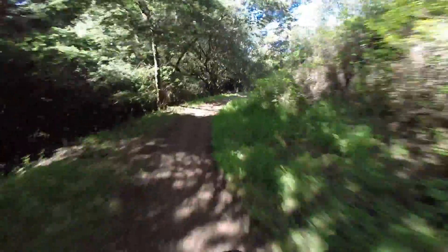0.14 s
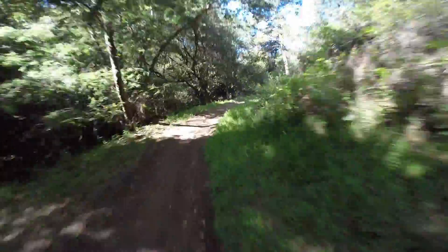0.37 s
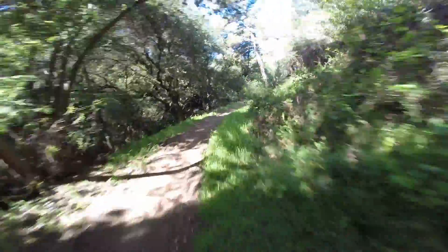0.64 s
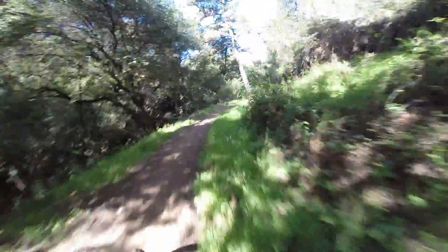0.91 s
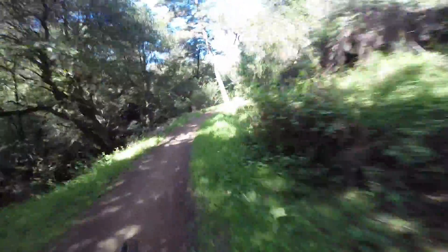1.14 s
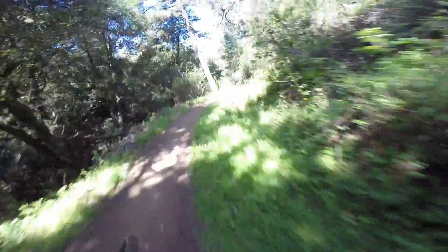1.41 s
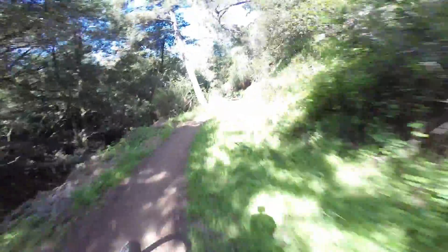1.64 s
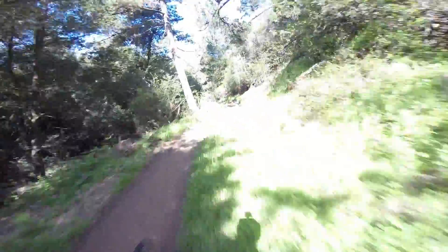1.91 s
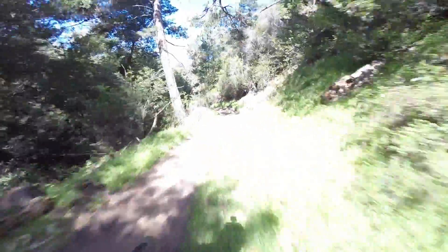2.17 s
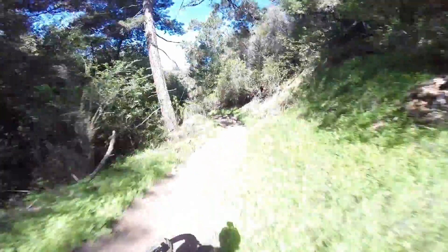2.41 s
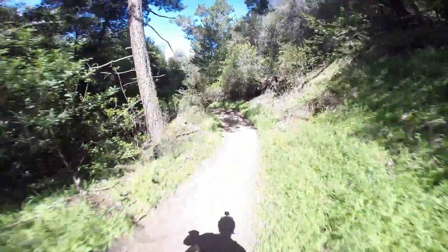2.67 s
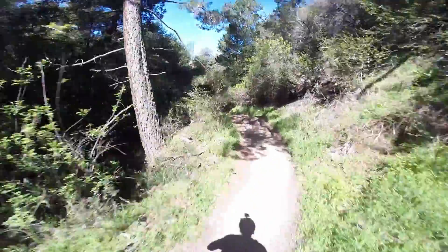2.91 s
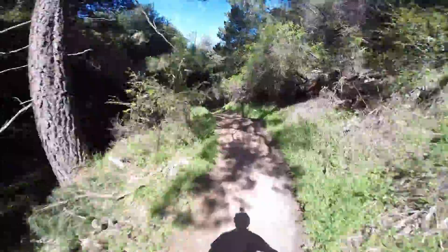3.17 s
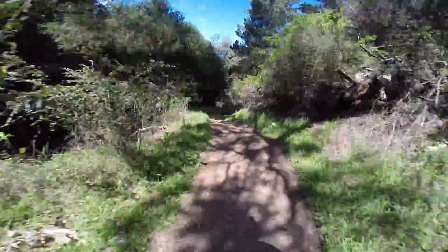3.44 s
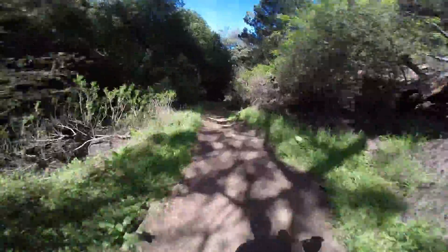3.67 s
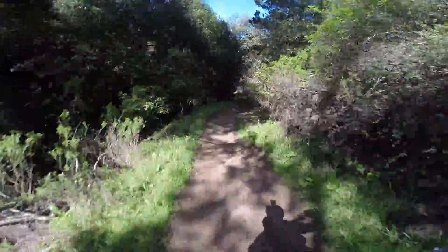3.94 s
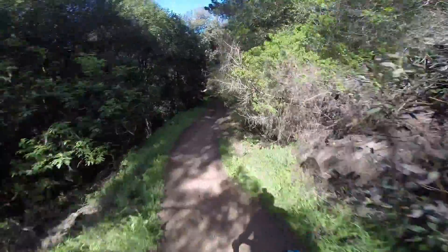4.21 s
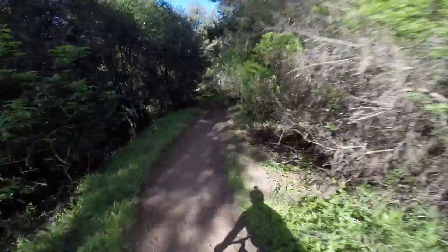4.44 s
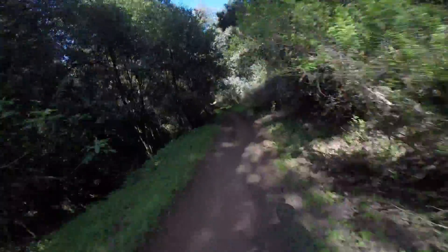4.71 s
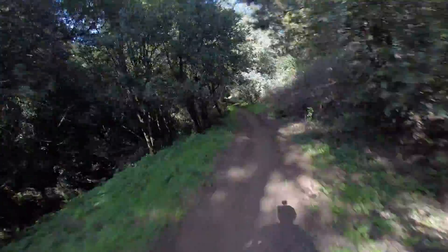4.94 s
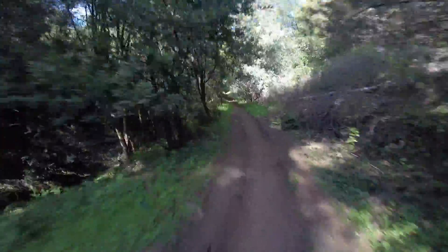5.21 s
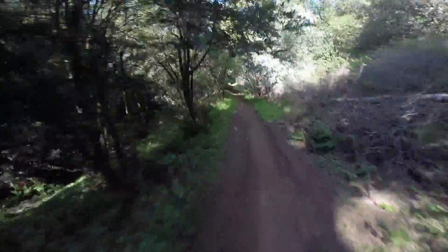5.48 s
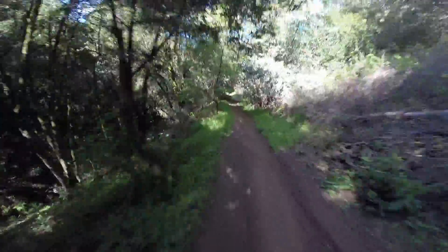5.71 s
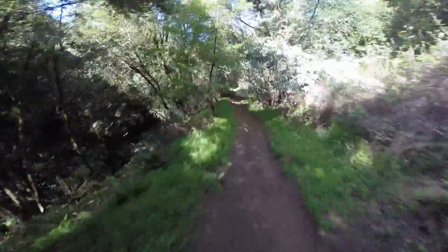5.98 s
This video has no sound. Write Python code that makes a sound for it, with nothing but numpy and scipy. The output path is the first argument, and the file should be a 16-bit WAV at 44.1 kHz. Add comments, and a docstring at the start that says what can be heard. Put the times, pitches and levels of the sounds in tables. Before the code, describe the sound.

A small cased camera rides on a mountain bike along a woodland dirt trail. Loud low wind buffets and thumps, strongest in the first second and a half, over a rough gritty tyre roar. It eases in the middle, a brake pad chirps briefly, then sharp plastic knocks and rattles cluster as the tyres grow gritty again. Close, dry, slightly overloaded sound.

```python
"""Mountain bike ride with a small camera

A small camera in a plastic case rides on a mountain bike down a dirt trail through woodland.
Wind is lumpy noise and single pressure swings; tyre roar and flying grit are noise and sharp grains,
coloured by the case. Knocks of the case on its mount ring its modes, with small chance ticks between.
A brake pad squeaks briefly as rough gliding tones, and the electronics whine faintly underneath."""
import sys
import numpy as np
from scipy import signal
from scipy.io import wavfile

SR = 44100
rng = np.random.default_rng(int(sys.argv[2]) if len(sys.argv) > 2 else 0)


def transcribe(u):
    """Save the signal u as a 16-bit wav file named by the first command-line argument.

    u: samples, shape (n,) or (channels, n), limited to [-1, 1]; the rate is SR.
    q: integer samples, one column per channel.
    """
    v = np.clip(np.atleast_2d(u).T, -1, 1)
    q = np.round(v * 32767).astype(np.int16)
    wavfile.write(sys.argv[1], SR, q)


def volts_from_db(level):
    """Convert decibel levels to linear amplitude ratios."""
    exponent = np.asarray(level, float) / 20
    return 10 ** exponent


N = 269010   # length in samples

# How the tyres on dirt swell and fade. Each row: start in seconds, roar in dB, grit hiss in dB,
# fine grit in dB. The roar's average sets the loudness before a final gain;
# of hiss and fine grit only the ups and downs count.
TYRE_LEVELS = [(0.0, -42, -55.5, -61), (0.64, -38.5, -55.5, -63.5), (0.87, -39, -55.5, -66.5),
               (1.17, -38.5, -57.5, -69), (1.26, -40, -56, -66.5), (1.41, -36.5, -56, -69),
               (1.46, -44, -61.5, -73), (1.56, -42.5, -62.5, -89.5), (1.62, -46, -66, -84.5),
               (1.73, -44.5, -64, -80.5), (2.39, -45.5, -61, -69.5), (2.9, -44.5, -60, -72),
               (3.09, -39.5, -57, -71), (3.35, -40.5, -55.5, -68.5), (3.6, -38.5, -55, -66),
               (3.89, -43.5, -54.5, -63), (4.16, -47.5, -60.5, -67.5), (4.45, -42, -57.5, -70.5),
               (4.61, -42, -57.5, -71), (4.66, -37.5, -52, -65), (4.82, -40.5, -57.5, -64.5),
               (5.21, -38.5, -51, -61.5), (5.59, -41, -54.5, -61.5), (5.95, -38, -50.5, -57.5),
               (6.1, -38.5, -52.5, -64)]


def rms_one(x):
    """Scale to an rms (average strength) of 1."""
    return x / np.sqrt(np.mean(x ** 2) + 1e-20)


def in_time(rows):
    """Columns of a table after the first, joined by straight lines, one value a sample."""
    s, *columns = np.transpose(rows)
    return [np.interp(np.arange(N) / SR, s, c) for c in columns]


def blend(hz, centres_hz, values):
    """Value at hz between values that belong to a few centres, straight on a log pitch axis."""
    place = np.interp(np.log(hz), np.log(centres_hz), np.arange(len(centres_hz)))
    return sum(max(0, 1 - abs(place - k)) * v for k, v in enumerate(values))


def drift(rate_hz):
    """Smooth random wandering of spread 1: noise through two equal low-pass steps at rate_hz."""
    hop = 40   # computed at every 40th sample, then joined by lines
    r = np.exp(-2 * np.pi * rate_hz * hop / SR)
    noise = rng.standard_normal(N // hop + 2002)
    slow = signal.lfilter([1], [1, -2 * r, r * r], noise)[2000:]   # drop the filter's start
    return np.interp(np.arange(N) / hop, np.arange(len(slow)), rms_one(slow))


def coloured(sources, colour, per_octave):
    """Yields centre and signal of each band; neighbours take unrelated sources; the sum has rms near 1."""
    hz, db = np.transpose(colour)
    edges = np.geomspace(hz[0], hz[-1], int(per_octave * np.log2(hz[-1] / hz[0])) + 1)
    centres = np.sqrt(edges[1:] * edges[:-1])
    gains = np.array([volts_from_db(blend(c, hz, db)) for c in centres])
    gains /= np.sqrt(np.sum(gains ** 2 * np.diff(edges)) / (SR / 2))
    for k, centre in enumerate(centres):
        band = signal.butter(2, edges[k:k + 2], "band", fs=SR, output="sos")
        source = sources[k % 2]
        run_in = signal.sosfilt(band, np.r_[source[-SR // 4:], source])   # lets the filter settle first
        yield centre, gains[k] * run_in[-N:]


def whine():
    """Thin tones of the electronics at multiples of one pitch, which wavers a little."""
    # Each row: multiple of the base pitch, level in dB rms before the swell.
    tone_rows = [(3, -79.5), (4, -85.5), (5, -88.5)]
    # The whine comes and goes. Each row: time in seconds, gain in dB.
    swell_rows = [(0, -5.5), (1.4, -8), (2.8, -14), (3.0, 4), (4.3, 2), (4.5, -9), (6.1, 3)]
    base_hz, waver_hz = 2926, 3.5
    turns = np.cumsum(base_hz + waver_hz * drift(1.5)) / SR
    tones = sum(volts_from_db(db) * np.sqrt(2) * np.sin(2 * np.pi * k * turns) for k, db in tone_rows)
    return tones * volts_from_db(in_time(swell_rows)[0])


def brake():
    """A brake pad grazes its disc: short gliding tones, rough as their size and phase wander quickly."""
    # Each row: start in seconds, length in seconds, middle pitch in Hz, whole glide in Hz,
    # level in dB rms before the fades at both ends.
    squeak_rows = [(3.428, 0.098, 6200, 102, -58), (3.543, 0.059, 6150, 96, -54),
                   (3.642, 0.035, 6200, 1, -55), (3.74, 0.11, 6100, 146, -60),
                   (3.864, 0.033, 6160, -200, -50), (3.954, .03, 3130, -600, -36.5),
                   (3.955, 0.034, 10300, -100, -63)]
    rough_hz = 300   # speed of the wandering
    out, r = np.zeros(N), np.exp(-2 * np.pi * rough_hz / SR)
    for s, length, hz, glide_hz, db in squeak_rows:
        noise = rng.standard_normal((2, 8000))
        wander = signal.lfilter([1], [1, -2 * r, r * r], noise)[:, 1000:]
        size = int(length * SR)
        pitch_hz = hz + glide_hz * np.linspace(-.5, .5, size)
        phase = np.cumsum(2 * np.pi * pitch_hz / SR)
        tone = (rms_one(wander)[:, :size] * [np.cos(phase), np.sin(phase)]).sum(axis=0)
        out[int(s * SR):][:size] += volts_from_db(db) * tone * np.sqrt(np.hanning(size))
    return out


def ticks():
    """Rows like those of the knocks, at chance moments; their strength follows the grit hiss."""
    per_s = 24
    rings_db, spread_db = [-36, -47, -53], 4   # low, middle and high ring; chance spread of each
    moments = rng.random(int(per_s * N / SR)) * (N - 1)   # in samples
    hiss_db = in_time(TYRE_LEVELS)[1]
    follow_db = (hiss_db - hiss_db.mean())[moments.astype(int), None]
    chance_db = spread_db * rng.standard_normal((len(moments), 3))
    return np.c_[moments / SR, rings_db + follow_db + chance_db]


def knocks():
    """Each knock or tick strikes every mode of the case; the contact takes time, so the ring swells in."""
    # Clear knocks and ticks on the case. Each row: start in seconds, then strength of the low,
    # middle and high ring in dB, to which each mode adds its own level.
    knock_rows = [(0.223, -41, -50, -34), (0.244, -40, -52, -37), (0.439, -28, -28, -55),
                  (0.759, -12, -51, -43), (1.395, -26, -35, -46), (2.376, -26, -42, -56),
                  (2.698, -25, -47, -60), (2.917, -46, -36, -54.5), (3.889, -30, -37, -44),
                  (3.9515, -36, -33.5, -29), (4.095, -45, -43, -49), (4.1397, -32, -14, -38),
                  (4.198, -40, -35, -55), (4.249, -31, -45, -47), (4.623, -23.5, -35, -54),
                  (4.6893, -8, -29.5, -40), (4.714, -30, -53, -37), (4.7942, -13, -31, -45),
                  (4.757, -31, -55, -42), (4.855, -29, -45, -42), (4.878, -34, -50, -42),
                  (4.912, -25, -54, -41), (4.949, -32, -53, -45), (4.967, -35, -46, -38),
                  (5.024, -40, -51, -33.5), (5.128, -9, -34.5, -39), (5.175, -17, -52, -34),
                  (5.346, -27, -32, -41), (5.507, -29, -55, -52), (5.597, -30, -53, -36),
                  (5.714, -34, -32, -48), (5.9, -27, -40, -37), (5.939, -39, -46, -40),
                  (5.989, -29, -32, -50), (6.03, -24, -38, -34)]
    # Modes of the case. Each row: pitch in Hz, relative level in dB, time to die away by 60 dB in seconds.
    mode_rows = [(700, -21.5, 0.0055), (887, -11.5, 0.0084), (1060, -9.5, 0.0094), (1267, -11.5, 0.003),
                 (1486, -9.5, 0.009), (2020, -14.5, 0.011), (2670, -7, 0.0099), (2880, -6.5, 0.0089),
                 (3007, -7.5, 0.011), (3400, -10, 0.0038), (4200, -16.5, .009), (5200, -7, 0.011),
                 (6200, 1, 0.0054), (6870, -3.5, 0.0076), (8600, -19.5, .004), (10500, -18, .003),
                 (12200, -22.5, .003)]
    # Where the low, middle and high ring are centred, in Hz.
    ring_centres_hz = [870, 2800, 6340]
    # How long a contact lasts, in cycles, for the low, middle and high ring.
    contact_cycles = [3.1, 0.75, 1.5]
    mixed_hz, crack_hz = 5200, 9500   # at the first, and from the second up: middle and high ring alike
    low_top_hz = 1400   # below this, neighbouring modes start in opposite directions
    lag_s, on_time_hz = .006, 1000   # there deeper modes start later (lag for each factor e): pitch falls
    scatter_db = 1.2   # chance spread of each mode at each knock

    s, *rings_db = np.transpose(np.r_[knock_rows, ticks()])
    low_db, middle_db, high_db = rings_db
    crack_db = .5 * (middle_db + high_db)
    centres_hz = [*ring_centres_hz[:2], mixed_hz, ring_centres_hz[2], crack_hz]
    strengths_db = [low_db, middle_db, crack_db, high_db, crack_db]
    at, out = (s * SR).astype(int), np.zeros(N)
    chance = rng.standard_normal((len(s), len(mode_rows)))
    for k, (hz, level_db, t60) in enumerate(mode_rows):
        is_low = hz < low_top_hz
        lag = int(is_low * lag_s * np.log(on_time_hz / hz) * SR)
        clicks = np.full(N, 1e-18)
        strike_db = blend(hz, centres_hz, strengths_db) + level_db + scatter_db * chance[:, k]
        clicks[np.clip(at + lag, 0, N - 1)] = volts_from_db(strike_db)
        clicks *= (-1) ** k if is_low else 1
        w = 2 * np.pi * hz / SR
        r = volts_from_db(-60 / (t60 * SR))
        soft = np.exp(-hz / (blend(hz, ring_centres_hz, contact_cycles) * SR))
        ringing = signal.lfilter([0, np.sin(w)], [1, -2 * r * np.cos(w), r * r], clicks)
        out += signal.lfilter([2 * (1 - soft)], [1, -2 * soft * np.cos(w), soft * soft], ringing)
    return out


def sprays():
    """Treble change in dB as grit hits the frame: a quick onset, a hold, then an equally long fade."""
    # Grit thrown up against the frame. Each row: start in seconds, length of the hold in seconds,
    # change of the treble in dB.
    spray_rows = [(0.202, .05, 2), (0.384, 0.043, 1), (3.85, 0.04, 1), (4.48, .04, 4), (4.623, 0.034, 2),
                  (4.706, 0.018, 9.5), (4.846, 0.027, 2.5), (4.941, .02, 4), (5.099, 0.027, 4),
                  (5.197, 0.028, 4), (5.285, .03, 5), (5.58, 0.026, 2.5), (5.85, 0.024, -1.5)]
    attack_s = .003
    t, total_db = np.arange(N) / SR, np.zeros(N)
    for s, length, db in spray_rows:
        full = s + attack_s
        total_db += np.interp(t, [s, full, full + length, full + 2 * length], [0, db, db, 0])
    return total_db


def tyres():
    """Knobs tearing at the dirt give a noisy roar, thrown grit sharp grains; jolts jump up and settle."""
    # Tone colour of tyres and grit. Each row: pitch in Hz, relative level in dB.
    tyre_colour = [(900, 5), (1200, -3), (1630, -7.5), (2310, -6.5), (2910, -5.5), (3500, -13), (4150, -21),
                   (4620, -14.5), (5000, -24.5), (6100, -16.5), (6800, -21), (7500, -29.5), (8700, -32),
                   (10000, -38), (15200, -47)]
    # Roar below the first pitch, hiss between the middle two, fine grit above the last, in Hz.
    tyre_layers_hz = [3240, 5300, 7000, 10500]
    # A spray is felt from the first pitch up, fully from the second, in Hz.
    spray_range_hz = [5000, 11000]
    jolts_per_s, settle_s = 50, 0.01
    grains_per_s, clumps_db = 500, -1.0   # grains come a little sparser at the height of a jolt
    spread_db, grain_share = 12.0, 0.19   # spread of grain sizes; share of grains in the power
    patchy_db, bumpy_db, gain_db = 1.54, 1.22, 1.5   # slow wandering, level jump at jolts, final gain

    levels_db, spray_db = in_time(TYRE_LEVELS), sprays()
    roar_db, hiss_db, fine_db = [db - db.mean() for db in levels_db]
    jolts = (rng.random(N) < jolts_per_s / SR) * rng.exponential(1, N)
    bumps = signal.lfilter([1], [1, -np.exp(-1 / (settle_s * SR))], jolts + 1e-18)
    bumps = np.minimum(rms_one(bumps - bumps.mean()), 2.5)

    thrown = rng.random(N) < grains_per_s * volts_from_db(clumps_db * bumps) / SR
    sizes = volts_from_db(spread_db * np.minimum(rng.exponential(1, N), 4.0)) * rng.choice([-1, 1], N)
    grit = rms_one(thrown * sizes)
    roar = rng.standard_normal((2, N))
    rolling = np.sqrt(1 - grain_share) * roar + np.sqrt(grain_share) * grit

    out = np.zeros(N)
    for hz, band in coloured(rolling, tyre_colour, per_octave=7.0):
        swing_db = blend(hz, tyre_layers_hz, [roar_db, hiss_db, hiss_db, fine_db])
        swing_db = swing_db + blend(hz, spray_range_hz, [0, 1]) * spray_db
        out += band * volts_from_db(swing_db + bumpy_db * bumps + patchy_db * drift(10))
    return out * volts_from_db(levels_db[0].mean() + gain_db)


def thumps():
    """Single eddies slam the port: a suck, then a push, one smooth pressure cycle, quicker if small."""
    # Each row: start in seconds, peak in dB before the common gain, pitch in Hz.
    thump_rows = [(0.201, 2, 108), (0.24, -18, 550), (0.384, -12, 500), (0.392, 0, 398), (0.436, 6, 109),
                  (0.755, 2, 109), (0.774, 6, 111), (1.246, 0, 450), (1.429, 6, 150), (1.487, -3, 109),
                  (1.5095, -17, 400), (1.553, 2.5, 450), (1.721, -17, 537), (1.878, -5, 440),
                  (2.6983, 3.5, 98), (2.698, -14, 600), (4.298, -8, 350), (4.323, 2, 131), (4.338, 3, 132),
                  (4.359, -2, 107), (4.427, 0.5, 109), (4.708, 0, 111), (4.751, -1, 110), (4.974, -3, 110),
                  (5.287, -1, 126)]
    gain_db = -8.0
    out = np.zeros(N)
    for s, db, hz in thump_rows:
        at, t = int(s * SR), np.arange(-3, 3, 2 * np.pi * hz / SR)
        cycle = t * np.exp(.5 - t ** 2 / 2) * np.sqrt(np.hanning(len(t)))
        out[at:at + len(t)] += volts_from_db(db + gain_db) * cycle
    return out


def wind():
    """Eddies over the port: lumpy noise, lumps quicker in higher bands, small gusts in the bass."""
    # Wind on the port. Each row: start in seconds, rumble in dB, flutter in dB. The ups and downs
    # shape the bands; the averages together set the loudness before a final gain.
    wind_levels = [(0.0, -25, -31.5), (0.08, -14.5, -28.5), (0.3, -15, -23), (0.55, -18, -22),
                   (0.65, -10.5, -22.5), (0.72, -15, -23), (0.77, -10, -19), (0.85, -14, -20.5),
                   (1.12, -13, -17.5), (1.21, -22.5, -18), (1.29, -16, -17.5), (1.47, -11.5, -18),
                   (1.55, -20, -15.5), (1.59, -19.5, -22), (2.33, -18.5, -27), (2.67, -24, -27.5),
                   (2.7, -21, -23.5), (2.74, -19, -28), (3.69, -14, -26), (3.82, -25.5, -27),
                   (3.96, -17, -30), (4.27, -24, -32.5), (4.315, -11.5, -24), (4.38, -11, -23),
                   (4.42, -22.5, -29.5), (4.52, -18.5, -22), (4.66, -24, -27.5), (4.7, -15, -24),
                   (4.94, -17, -28), (5.15, -19, -24.5), (5.28, -13.5, -22.5), (5.38, -18.5, -26.5),
                   (5.66, -17, -26), (5.72, -20, -24), (5.77, -16, -23), (6.02, -19.5, -23.5),
                   (6.1, -18.5, -23.5)]
    # Where rumble and flutter are centred, in Hz.
    wind_layers_hz = [120, 600]
    # Tone colour of the wind. Each row: pitch in Hz, relative level per Hz in dB.
    wind_colour = [(11, -33), (18, -5), (54, 1.5), (168, -2.5), (247, -6), (1030, -26), (1370, -45),
                   (1800, -36.5), (2340, -66), (3960, -120)]
    shared_db, own_db, gusty_db = 1.5, 1.0, -0.5   # lumps of all bands, of each band, and of the bass
    top_hz, top_follows = 1300, 0.71   # from here up the flutter swings less, by this factor
    gain_db = 1.48

    levels_db, eddies, gusts = in_time(wind_levels), drift(37), drift(12.0)
    rumble_db, flutter_db = [db - db.mean() for db in levels_db]
    out = np.zeros(N)
    for hz, band in coloured(rng.standard_normal((2, N)), wind_colour, per_octave=3.0):
        lumps_db = shared_db * eddies + own_db * drift(3 + hz / 30)
        lumps_db = lumps_db + blend(hz, wind_layers_hz, [gusty_db, 0]) * gusts
        swings_db = [rumble_db, flutter_db, top_follows * flutter_db]
        swing_db = blend(hz, [*wind_layers_hz, top_hz], swings_db)
        out += band * volts_from_db(swing_db + lumps_db)
    power = sum(volts_from_db(db.mean()) ** 2 for db in levels_db)
    return out * np.sqrt(power) * volts_from_db(gain_db)


def scene():
    """All sources added up at one microphone."""
    return (whine() + brake() + knocks() + tyres() + thumps() + wind())[None]


def band_limit(x):
    """A steep low-pass at the top of the band."""
    return signal.sosfilt(signal.butter(12, 15070, fs=SR, output="sos"), x)


def record(dry):
    """The loudest peaks are rounded off smoothly, as in an overdriven input."""
    top = 1.15   # the level that the peaks approach
    mix = top * np.tanh(dry / top)
    return band_limit(mix)


dry = scene()
out = record(dry)
transcribe(out)
```